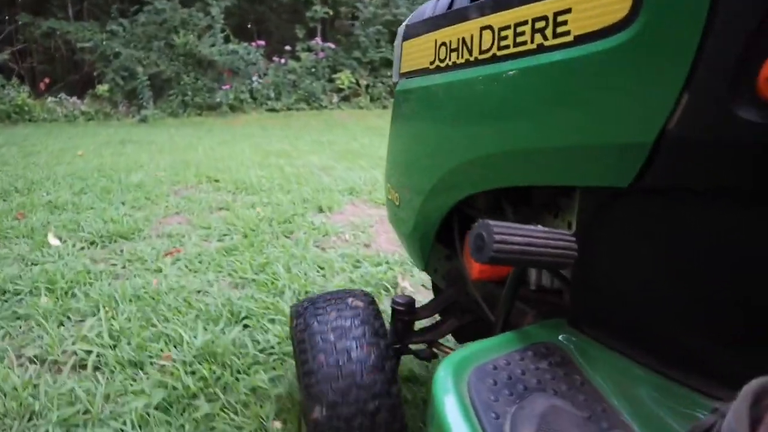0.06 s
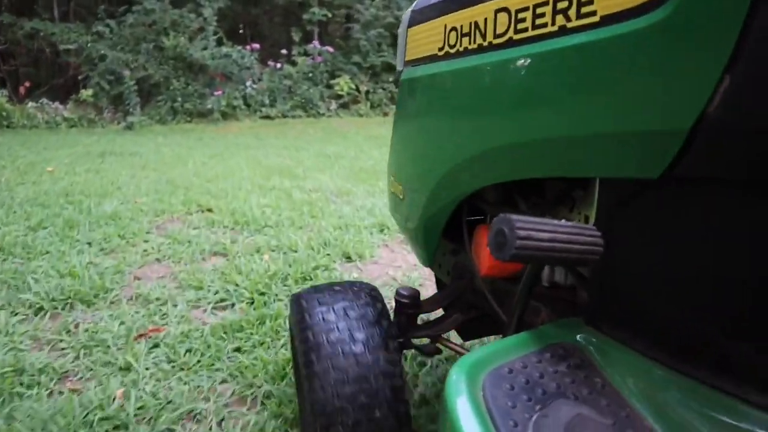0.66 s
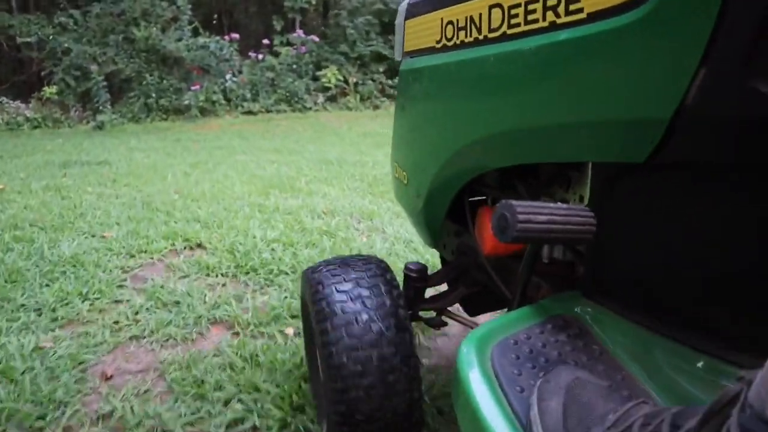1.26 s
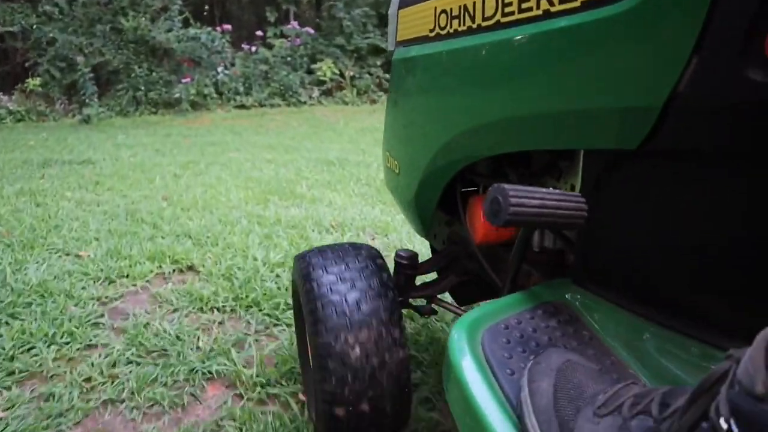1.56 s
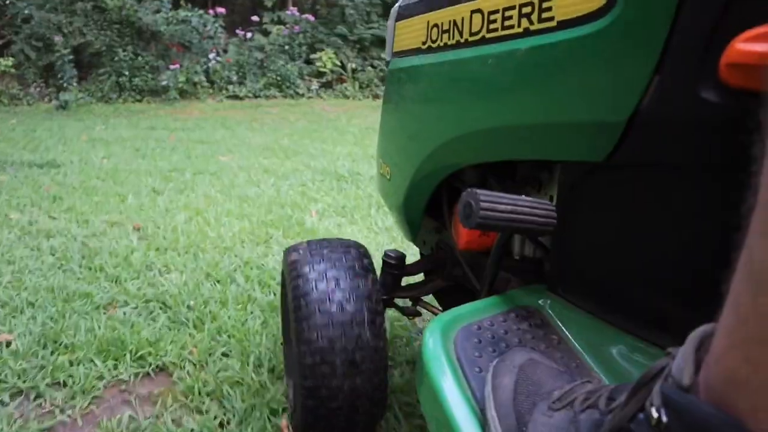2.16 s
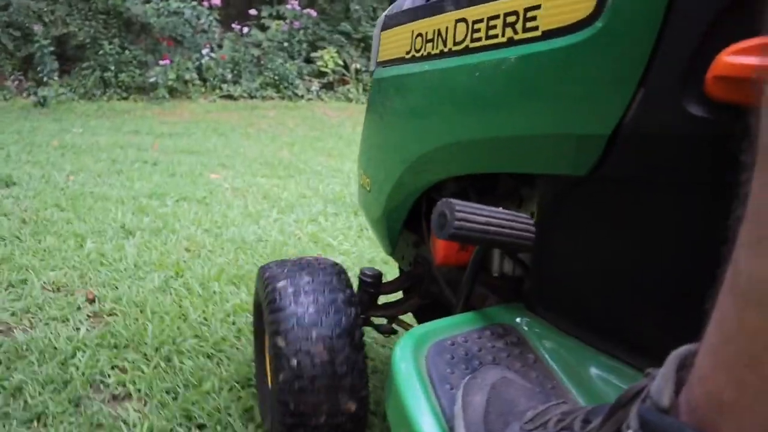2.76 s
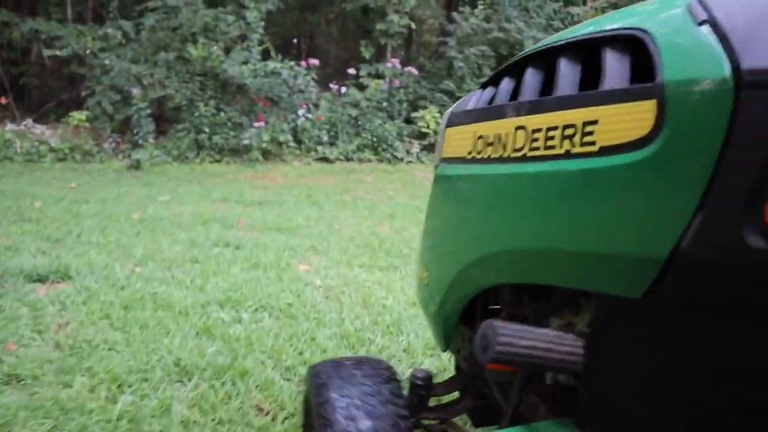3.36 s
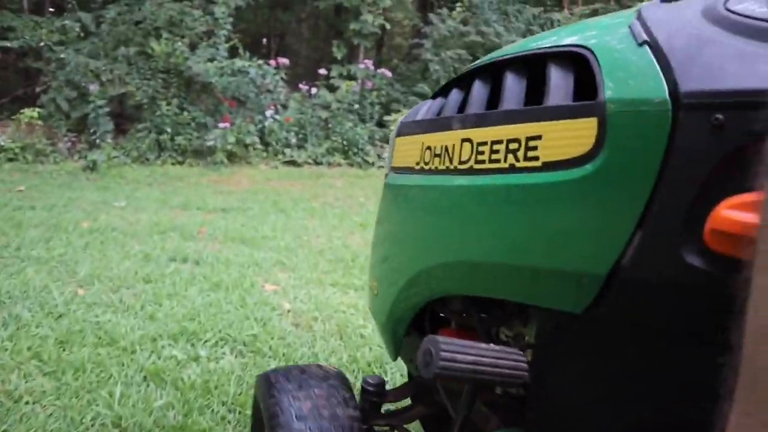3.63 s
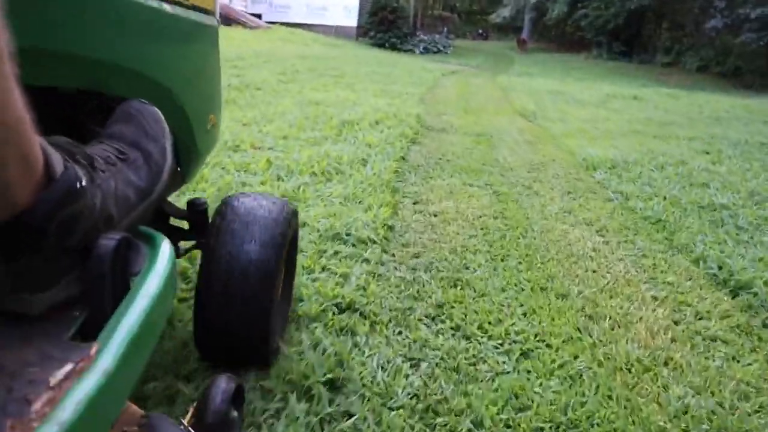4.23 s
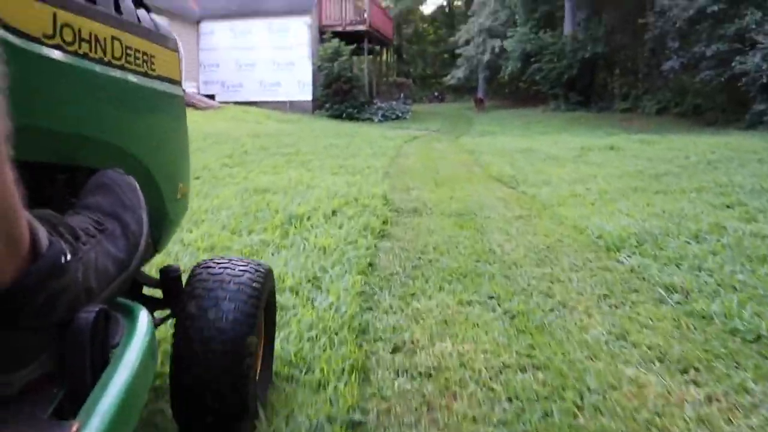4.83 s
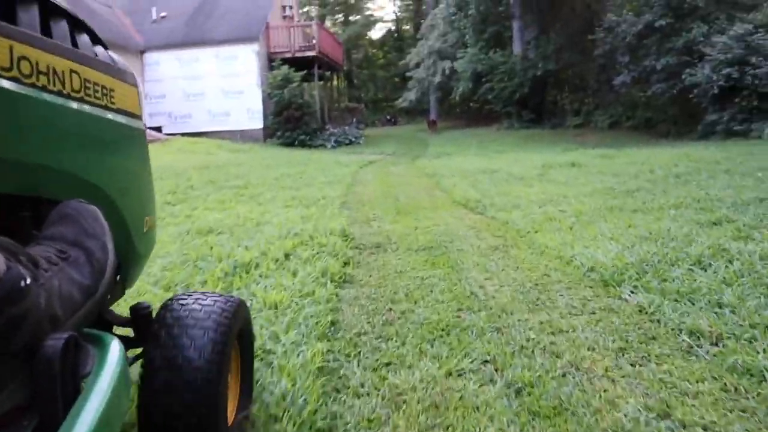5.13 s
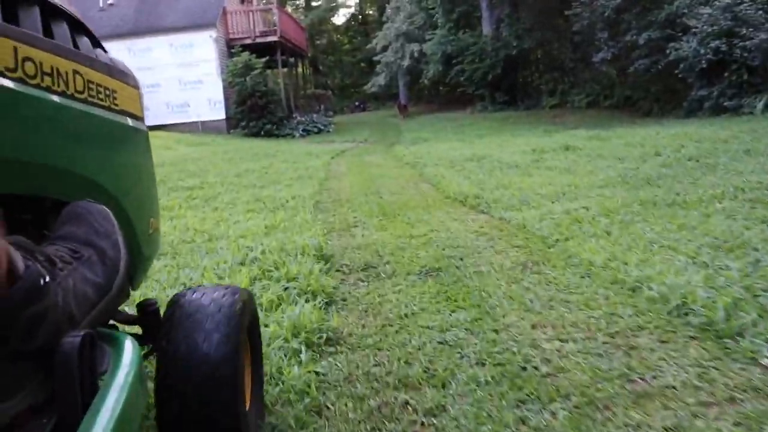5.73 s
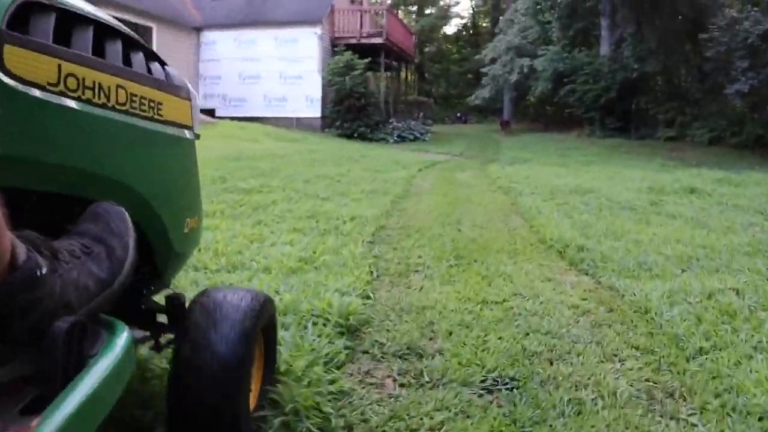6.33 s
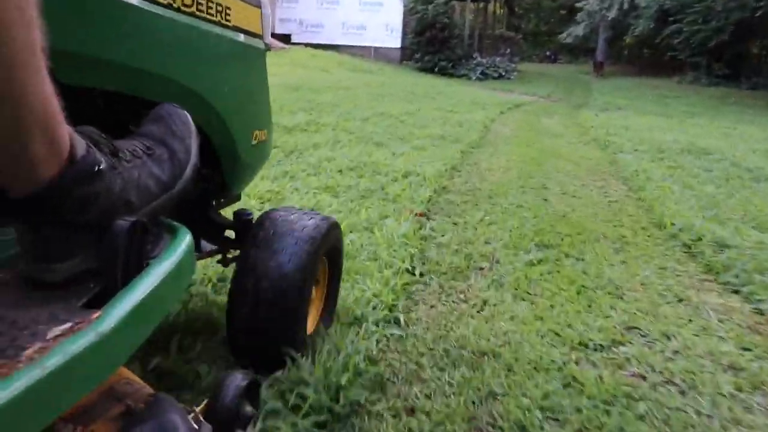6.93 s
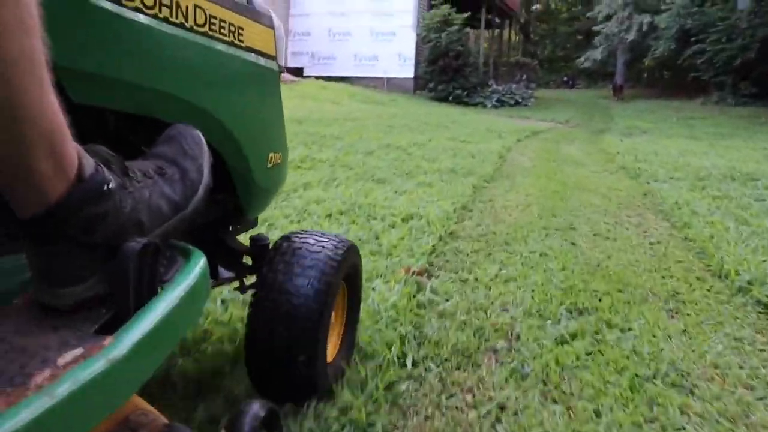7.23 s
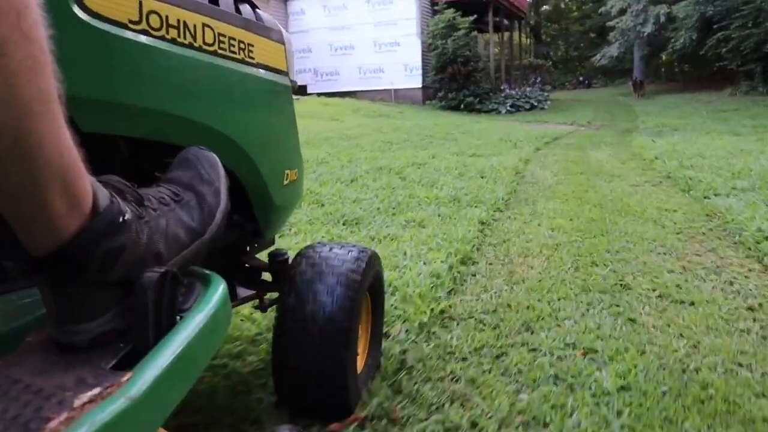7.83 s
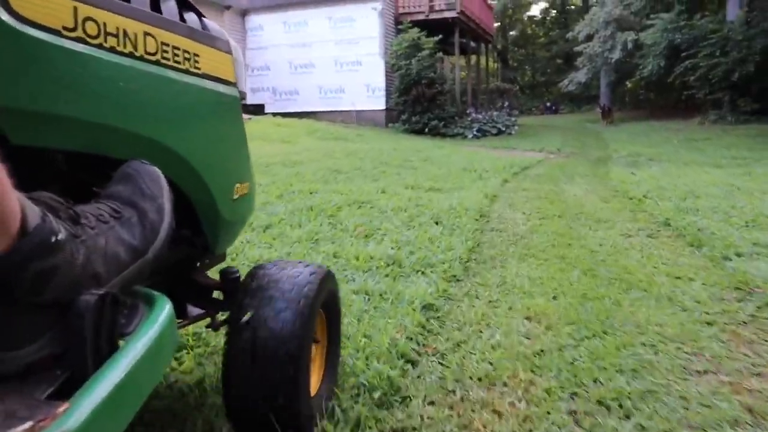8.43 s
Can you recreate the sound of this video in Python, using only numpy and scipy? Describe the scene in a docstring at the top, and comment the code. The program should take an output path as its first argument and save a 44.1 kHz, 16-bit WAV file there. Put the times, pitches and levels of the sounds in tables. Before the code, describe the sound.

A riding mower drones and rattles while cutting grass, then abruptly switches to rolling with blades off, its engine wavering amid hiss.

```python
"""On a lawn, beside the driver's foot on a single-cylinder riding mower: two scenes, a brief dip between.
First the blades cut: a beating, throbbing drone over the engine, with rattling panels, a chirping belt,
rushing air, ticking clippings and one twig that strikes the steel deck. Then, from the other side and
with the blades off, the mower rolls amid a wide treble hiss. Its engine hunts on the governor: the
exhaust barks harder when the speed sags, and the cooling fan whines as its pitch crosses a resonance."""
import sys
import numpy as np
from scipy import signal
from scipy.fft import rfft, irfft
from scipy.io import wavfile
from scipy.ndimage import uniform_filter1d, map_coordinates

SR = 44100
rng = np.random.default_rng(int(sys.argv[2]) if len(sys.argv) > 2 else 0)


def dump_mix(stems):
    """Bounce the given channels to the path in sys.argv[1] as a 16-bit WAV at rate SR."""
    frames = np.atleast_2d(stems).T  # one column per channel
    limited = np.clip(frames, -1, 1)  # hard clip at full scale
    pcm = np.round(limited * 32767).astype(np.int16)
    wavfile.write(sys.argv[1], SR, pcm)


N = 383229
TIME = np.arange(N) / SR
HZ = np.fft.rfftfreq(N, 1 / SR)


def gain_of(db):
    return 10 ** (np.asarray(db) / 20)


def unit_rms(x):
    return x / np.sqrt(np.mean(x ** 2) + 1e-20)


def spectrum(rows):
    """One value per FFT bin, interpolated in log frequency."""
    hz, value = np.transpose(rows)
    return np.interp(np.log(HZ + 1), np.log(hz + 1), value)


def curves(rows):
    """One value per sample for each column of a timed table."""
    seconds, *columns = np.transpose(rows)
    return [np.interp(TIME, seconds, column) for column in columns]


def wander(cycles):
    """A new random value at each whole cycle, joined by ramps."""
    steps = cycles - np.floor(cycles.min())
    return map_coordinates(rng.standard_normal(int(steps.max()) + 2), [steps], order=1)


def bump(cycles, at, width):
    """One smooth bump a cycle; place and width in cycles."""
    return np.exp(-(np.sin(np.pi * (cycles - at)) / (np.pi * width)) ** 2)


def stereo_noise(colour_db, coherence):
    """Coloured noise, partly shared between left and right."""
    a, b = rfft(rng.standard_normal((2, N)))
    alike = np.clip(spectrum(coherence), 0, 1)
    shared, apart = a * np.sqrt((1 + alike) / 2), b * np.sqrt((1 - alike) / 2)
    return unit_rms(irfft(np.array([shared + apart, shared - apart]) * gain_of(colour_db), N))


def tone(cycles, order, db, rough, flutter_hz):
    """One rotating order, shaken in level and phase by turbulence."""
    shake = 1 + rough * (wander(TIME * flutter_hz) + 1j * wander(TIME * flutter_hz))
    carrier = np.exp(2j * np.pi * (order * cycles + rng.random()))
    return np.sqrt(2) * gain_of(db) * (shake * carrier).real


def pan(sound, balance, lead, corner_hz, steepness):
    """Tilts the level; one side leads (+1 left, -1 right), nearing opposite phase in the treble."""
    phase = lead * np.pi * (1 - np.exp(-(HZ / corner_hz) ** steepness))
    lean = gain_of(spectrum(balance) / 2) * np.exp(.5j * phase)
    pair = np.array([lean, 1 / lean])
    return irfft(rfft(sound) * pair / np.sqrt(np.mean(abs(pair) ** 2, 0)), N)


def crank(rpm):
    """Counts firing cycles, one per two turns of a slightly uneven crank."""
    return np.cumsum(rpm) / (2 * 60 * SR) + .003 * wander(TIME * 6)


def pulses(cycles, gains, phases, at, uneven_db, jitter):
    """One pulse a cycle, built from firing orders; no two match in timing or strength."""
    size = 2048
    shape = irfft(np.r_[0, gains * np.exp(1j * phases)], size) * size / np.sqrt(2)
    place = cycles - at + jitter * wander(cycles - at)
    strength = gain_of(uneven_db * wander(cycles - at))
    return np.interp(place % 1 * size, np.arange(size), shape) * strength


def engine(cycles, orders, effort, gulp_at, bark_at, gulp_sweep, uneven_db, jitter, gulp_orders):
    """Four-stroke: the intake gulps in the low orders, the exhaust barks in the rest. Timing in cycles."""
    order, db = np.transpose(orders)
    low = order <= gulp_orders
    gulp_phase = -np.pi * gulp_sweep * order ** 2
    # The pipe end returns the bark inverted and thinner; this sets its phases.
    echo_cycles, echo_equal_order = .148, 16
    echo = order / echo_equal_order * np.exp(-2j * np.pi * order * echo_cycles)
    bark_phase = np.angle(1j * (1 - echo))
    gulp = pulses(cycles, gain_of(db) * low, gulp_phase, gulp_at, uneven_db=.5, jitter=.002)
    bark = pulses(cycles, gain_of(db) * ~low, bark_phase, bark_at, uneven_db, jitter)
    return gulp * gain_of(.08 * effort) + bark * gain_of(.17 * effort)


# Valve knocks. Each row: place in cycles, relative level in dB.
VALVE_KNOCKS = [(.15, -1.5), (.58, 0.5), (.78, -7), (.96, -5)]

def valve_gear(cycles, modes, level_db):
    """The valve gear raps the sheet metal four times a cycle: a ringing rasp."""
    t = TIME[:SR // 8]
    hits = sum(gain_of(db) * np.diff(np.floor(cycles - at), append=np.floor(cycles[-1] - at))
               for at, db in VALVE_KNOCKS)
    hits *= gain_of(1.8 * rng.standard_normal(N))
    ring = sum(gain_of(db - 60 * t / t60) * np.sin(2 * np.pi * hz * t) for hz, db, t60 in modes)
    return gain_of(level_db) * unit_rms(signal.oaconvolve(hits, ring)[:N])


# Panel modes. Each row: frequency in Hz, relative level in dB, T60 in seconds.
HOOD_PANEL_MODES = [(1640, -4, .04), (1690, 0, .07), (1760, 0, .07), (1930, -6, .04)]
STEEL_DECK_MODES = [(4130, 0, .04), (4200, -2, .04), (4255, 1.5, .055), (4315, -4, .05), (5410, -11, .04),
                    (6450, -11, .02), (6960, -11, .025), (7320, -13, .04), (7750, -15, .02)]
# Panel rattle. Each row: time in seconds, level in dB.
HOOD_RATTLE_DB = [(0, -33), (1.35, -32.5), (1.7, -39), (2.6, -39), (3.2, -46), (3.75, -43)]
DECK_RATTLE_DB = [(0, -49), (1.45, -49), (1.6, -40.5), (2.8, -40), (3.2, -43), (3.75, -46)]

def rattle(taps_per_s=160):
    """Loose panels chatter, first mostly the hood, then the deck; each tap rings the modes unevenly."""
    t, out = TIME[:SR // 8], np.zeros((2, N))
    for modes, level in (HOOD_PANEL_MODES, HOOD_RATTLE_DB), (STEEL_DECK_MODES, DECK_RATTLE_DB):
        taps = rng.random(N) < taps_per_s / SR
        panel = np.zeros((2, N))
        for hz, db, t60 in modes:
            ring = gain_of(db - 60 * t / t60) * np.sin(2 * np.pi * hz * t)
            panel += signal.oaconvolve(taps * rng.standard_normal((2, N)), ring[None], axes=1)[:, :N]
        out += gain_of(curves(level)[0]) * unit_rms(panel)
    return out


# Drone overtones. Each row: multiple of the blade-tip rate, relative level in dB.
BLADE_ORDERS = [(4, -36), (5, -34.5), (6, -34), (7, -35), (9, -45), (10, -37.5), (11, -42), (14, -42.5),
                (20, -51)]
# Throbs of the drone's octave. Each row: peak time in seconds, relative level in dB.
OCTAVE_THROBS = [(0.22, -28), (0.55, -25.5), (0.87, -27), (1.32, -21), (1.71, -20.5), (2.02, -27.5),
                 (2.42, -24.5), (3.04, -30), (3.31, -29)]

def blades(crank_rpm, belt_ratio=.842, beat_hz=.422, beat_peak_s=1.58, throb_s=.1):
    """Two tips a turn sweep the deck wall; one blade slips behind the other, so the drone beats."""
    rpm = belt_ratio * crank_rpm + 25.53 * wander(TIME * 5)
    passes = 2 * np.cumsum(rpm) / (60 * SR)
    beat = abs(gain_of(-33) + gain_of(-35.5) * np.exp(2j * np.pi * beat_hz * (TIME - beat_peak_s)))
    throb = sum(gain_of(db) * np.exp(-((TIME - s) / throb_s) ** 2) for s, db in OCTAVE_THROBS)
    fundamental = beat * tone(passes, 1, 0, rough=.077, flutter_hz=14)
    octave = (gain_of(-33) + throb) * tone(passes, 2, -1.4, rough=.073, flutter_hz=12)
    third = tone(passes, 3, -32, rough=.35, flutter_hz=7)
    overtones = sum(tone(passes, k, db, rough=.5, flutter_hz=min(3 * k, 15)) for k, db in BLADE_ORDERS)
    return fundamental + octave + third + gain_of(-1.5) * overtones


# Belt chirps. Each row: time in seconds, level in dB.
BELT_DB = [(0, -45), (.9, -42), (1.3, -44), (2, -46), (3.75, -50)]

def belt(pitch_hz=5530, wander_hz=55, slip_hz=30):
    """The deck belt slips on its pulley in brief, thin chirps."""
    cycles = np.cumsum(pitch_hz + wander_hz * wander(TIME * slip_hz)) / SR
    slip = np.clip(wander(TIME * slip_hz), 0, 1)
    chirps = slip * tone(cycles, 1, 0, rough=.7, flutter_hz=200)
    return gain_of(curves(BELT_DB)[0]) * unit_rms(chirps)


# Hiss swells and dips. Each row: place in cycles, width in cycles, gain in dB at pulsing=1.
HISS_BUMPS = [(.28, .09, 3.5), (.57, 0.065, -19), (.99, 0.062, 5)]

def air_rush(cycles, colour, resonances, coherence, effort, mid_db, hiss_db,
             puff, puff_at, clatter, pulsing):
    """Turbulence in the machine's cavities puffs with the exhaust and clatters with the valve gear."""
    resonance_db = sum(db * np.exp(-(2 * (HZ - hz) / width) ** 2) for hz, width, db in resonances)
    air = rfft(stereo_noise(spectrum(colour) + resonance_db, coherence))
    low = 1 / (1 + (HZ / 750) ** 4)
    high = 1 - 1 / (1 + (HZ / 6500) ** 4)
    puffs = unit_rms(1 + puff * bump(cycles, puff_at, width=.075))
    body = irfft(air * low, N) * gain_of(.23 * effort) * puffs
    valves = unit_rms(1 + clatter * bump(cycles, at=.9, width=.14))
    middle = irfft(air * (1 - low - high), N) * valves * gain_of(mid_db + wander(TIME * 18))
    cycle_db = pulsing * sum(db * bump(cycles, at, width) for at, width, db in HISS_BUMPS)
    hiss = irfft(air * high, N) * gain_of(hiss_db + cycle_db + 1.3 * wander(TIME * 40))
    return body + middle + hiss


def clippings(coherence, level_db=-39.5, hits_per_s=140, decay_s=.0056):
    """Bits of grass and grit tick against the deck."""
    hits = (rng.random(N) < hits_per_s / SR) * gain_of(-10 * np.minimum(rng.exponential(1, N), 4))
    envelope = signal.lfilter([1], [1, -np.exp(-1 / (decay_s * SR))], hits)
    colour_db = spectrum([(100, -70), (2500, 0), (6500, -1), (11000, -27), (14000, -45)])
    return gain_of(level_db) * unit_rms(envelope * stereo_noise(colour_db, coherence))


# Twig strike and rebounds. Each row: start in seconds, relative level in dB.
TWIG_BLOWS = [(1.506, -22), (1.509, -19), (1.521, -23), (1.527, -27)]

def twig():
    """Each blow cracks and rings the steel deck, a little differently left and right."""
    t, out = TIME[:SR // 4], np.zeros((2, N))
    band = signal.butter(3, [3200, 8000], "bandpass", fs=SR, output="sos")
    for start_s, db in TWIG_BLOWS:
        ring = sum(gain_of(mode_db - 60 * t / t60) * np.sin(2 * np.pi * (hz * t + rng.random((2, 1))))
                   for hz, mode_db, t60 in STEEL_DECK_MODES)
        crack = 1.2 * signal.sosfilt(band, np.exp(-t / .004) * rng.standard_normal((2, len(t))))
        start = round(start_s * SR)
        out[:, start:start + len(t)] += gain_of(db) * (ring + crack)
    return out


# Crank speed. Each row: time in seconds, speed in rpm.
MOWING_RPM = [(0, 3028), (0.68, 3004), (0.97, 3027), (1.75, 3004), (2.42, 3013), (3.16, 3017), (3.31, 2978),
              (3.47, 3010), (3.75, 2977)]
# Slow, irregular swell and dip of the engine's loudness. Each row: time in seconds, unitless effort.
ENGINE_SWELL = [(0, -1), (1.2, 6), (1.4, -8), (1.8, 6), (2.25, -8), (2.7, 0), (3.15, -7), (3.4, 8),
                (3.75, 1)]
# Engine tone. Each row: multiple of the firing rate, level in dB at zero effort.
MOWING_ENGINE_DB = [(1, -56), (2, -40.5), (3, -57), (4, -38), (5, -33.5), (6, -36.5), (7, -45.5), (8, -32),
                    (9, -42), (10, -32), (11, -32), (12, -51), (13, -35), (14, -38.5), (15, -40.5),
                    (16, -52), (17, -39.5), (18, -38), (19, -36.5), (20, -37.5), (21, -36.5), (22, -34.5)]
# Metal rung by the valve gear. Each row: frequency in Hz, relative level in dB, T60 in seconds.
MOWING_VALVE_MODES = [(1685, 8, 0.069), (1770, -10, 0.035), (2895, 2, 0.041), (3650, -21, 0.032),
                      (4130, -8, 0.079)]
# Air swell. Each row: time in seconds, mid gain in dB, treble gain in dB.
MOWING_AIR_DB = [(0, 0, -1.5), (0.5, -0.4, -0.5), (0.75, 0.4, -0.5), (1.3, 0.7, -1.5), (2.1, 0.5, -0.5),
                 (2.85, 0.5, -1.5), (3.2, -1.1, -4), (3.75, -1, -1)]
# Air spectrum. Each row: frequency in Hz, relative density in dB.
MOWING_AIR_COLOUR = [(30, -34), (62, -23), (90, -13), (140, -2), (280, -2.5), (370, -5.5), (530, -1.5),
                     (680, -6.5), (1450, -13), (1800, -10.5), (4100, -17.5), (7500, -28.5), (12400, -27.5),
                     (13800, -62)]
# Deck resonances and hollows. Each row: centre in Hz, width in Hz, gain in dB.
DECK_RESONANCES = [(110, 40, -5), (690, 90, -2), (850, 60, 2.5), (950, 80, 2), (1200, 90, 1.5),
                   (1480, 160, -1.5), (2200, 300, -1.5), (3700, 160, -3), (3970, 180, 2), (4440, 300, -2),
                   (5000, 400, -1.5)]
# Noise likeness. Each row: frequency in Hz, left-right coherence from 0 to 1.
MOWING_COHERENCE = [(130, 1), (300, .99), (630, .93), (1400, .66), (2800, .55), (5000, .74), (9000, .87),
                    (12000, .95)]
# Balance. Each row: frequency in Hz, left minus right in dB.
MOWING_PAN_DB = [(110, 0), (200, -1), (370, -1.5), (680, -2), (1250, -1.5), (2300, 0)]

def mowing():
    """The engine drives the blades; its loudness slowly swells and dips."""
    (rpm,), (effort,) = curves(MOWING_RPM), curves(ENGINE_SWELL)
    mid_db, hiss_db = curves(MOWING_AIR_DB)
    cycles = crank(rpm)
    motor = engine(cycles, MOWING_ENGINE_DB, effort, gulp_at=.42, bark_at=.89,
                   gulp_sweep=.07, uneven_db=2, jitter=.003, gulp_orders=10)
    air = air_rush(cycles, MOWING_AIR_COLOUR, DECK_RESONANCES, MOWING_COHERENCE, effort,
                   mid_db, hiss_db, puff=.21, puff_at=1, clatter=.21, pulsing=.33)
    ticks = clippings(MOWING_COHERENCE)
    metal = valve_gear(cycles, MOWING_VALVE_MODES, level_db=-38) + rattle()
    sound = motor + metal + blades(rpm) + belt() + gain_of(-18) * air + ticks + twig()
    return pan(sound, MOWING_PAN_DB, lead=-.81, corner_hz=2720, steepness=1.47)


def governor(rpm, set_rpm, smooth_s=.1):
    """The throttle opens: effort grows as the speed sags and while it picks up again."""
    pickup_rpm_per_s = uniform_filter1d(np.gradient(rpm) * SR, round(smooth_s * SR))
    return .024 * (set_rpm - rpm) + .0008 * pickup_rpm_per_s


# Slow fan swell. Each row: time in seconds, gain in dB.
FAN_SWELL_DB = [(3.81, -2), (4.15, -1.5), (4.32, 2), (4.55, -3), (4.95, 3.5), (5.35, 2.5), (5.62, -4),
                (5.82, 4), (6.2, 2), (6.45, -4), (6.78, -4.5), (7.1, -2), (7.55, 2), (7.85, 0), (8.1, -2.5),
                (8.3, 3), (8.55, -1), (8.69, -2)]

def fan(cycles, rpm, vanes=12, resonance_hz=652, width_hz=21.5):
    """The cooling fan's vanes whine, loudest where their pitch meets a hood resonance."""
    pitch_hz = vanes * rpm / 60
    bloom = gain_of(-31) + gain_of(-29.5) / (1 + (2 * (pitch_hz - resonance_hz) / width_hz) ** 2)
    return bloom * tone(cycles, 2 * vanes, curves(FAN_SWELL_DB)[0], rough=.2, flutter_hz=32)


# Fan and gear tones. Each row: multiple of the firing rate, level in dB.
WHINE_ORDERS = [(25, -40.5), (26, -44), (32, -40), (33, -42), (36, -48), (38, -48), (40, -42), (44, -44.5),
                (46, -54), (48, -45), (50, -46), (62, -53), (66, -53), (67, -51)]
# Whine on firing order 28. Each row: time in seconds, level in dB.
ORDER_28_DB = [(3.81, -32), (4.05, -30.5), (4.3, -38), (4.55, -35), (4.9, -43), (5.3, -37), (5.53, -30),
               (5.9, -35), (6.3, -36), (6.6, -45), (7.05, -38), (7.4, -33.5), (8.69, -33)]

def whine(cycles):
    """Fan and gears sing above the engine tone; one order comes and goes."""
    steady = sum(tone(cycles, k, db, rough=.35, flutter_hz=12) for k, db in WHINE_ORDERS)
    return steady + tone(cycles, 28, curves(ORDER_28_DB)[0], rough=.2, flutter_hz=12)


# Wide treble hiss. Each row: time in seconds, level in dB.
WIDE_HISS_DB = [(3.81, -44), (4.7, -44), (5.2, -51), (5.7, -49.5), (6.2, -46), (6.65, -42.5), (7.2, -40.5),
                (7.8, -41), (8.15, -43.5), (8.69, -41.5)]
# Its spectrum. Each row: frequency in Hz, relative density in dB.
WIDE_HISS_COLOUR = [(500, -41), (3000, -6.5), (5000, 2.5), (8000, -0.5), (11500, -2.5), (14000, -36.5)]

def wide_hiss(flicker_db=1.8, flicker_hz=40):
    """Treble hiss, different left and right, thins near 5-6 s and then returns."""
    hiss = irfft(rfft(rng.standard_normal((2, N))) * gain_of(spectrum(WIDE_HISS_COLOUR)), N)
    return unit_rms(hiss) * gain_of(curves(WIDE_HISS_DB)[0] + flicker_db * wander(TIME * flicker_hz))


# Hunting crank speed. Each row: time in seconds, speed in rpm.
ROLLING_RPM = [(3.81, 3254), (4.02, 3242), (4.19, 3199), (4.26, 3225), (4.66, 3111), (4.83, 3247),
               (5.4, 3195), (5.62, 3148), (5.8, 3261), (6.02, 3227), (6.84, 3174), (7.18, 3313),
               (7.53, 3086), (7.8, 3282), (8.21, 3192), (8.37, 3068), (8.57, 3250), (8.69, 3157)]
# Engine tone. Each row: multiple of the firing rate, level in dB at zero effort.
ROLLING_ENGINE_DB = [(1, -49.5), (2, -36), (3, -56), (4, -31.5), (5, -29), (6, -29.5), (7, -36.5),
                     (8, -29.5), (9, -32), (10, -33), (11, -37.5), (12, -38.5), (13, -45.5), (14, -39.5),
                     (15, -38), (16, -34), (17, -31.3), (18, -30), (19, -29.3), (20, -36.5), (21, -34),
                     (22, -35.5), (23, -40)]
# Metal rung by the valve gear. Each row: frequency in Hz, relative level in dB, T60 in seconds.
ROLLING_VALVE_MODES = [(1085, -5, .051), (1205, -8, .035), (1670, -3, .012), (1870, -6, .022),
                       (2240, -2, .013)]
# Air spectrum. Each row: frequency in Hz, relative density in dB.
ROLLING_AIR_COLOUR = [(25, -22), (70, -12), (110, -16), (260, -0.5), (350, -4), (500, -1.5), (800, -3.5),
                      (1450, -10), (1750, -8.5), (3400, -16), (4500, -19), (8500, -25.5), (12200, -23.5),
                      (13800, -36)]
# Hood resonances and hollows. Each row: centre in Hz, width in Hz, gain in dB.
HOOD_RESONANCES = [(800, 60, -3), (1590, 90, -2.5), (1860, 120, 2.5), (2900, 200, 1.5), (3950, 250, 1.5),
                   (5550, 400, 2), (7700, 900, 2)]
# Noise likeness. Each row: frequency in Hz, left-right coherence from 0 to 1.
ROLLING_COHERENCE = [(130, 1), (300, .98), (630, .92), (1400, .62), (2800, .62), (5000, .86), (8000, .975),
                     (12000, .998)]
# Balance. Each row: frequency in Hz, left minus right in dB.
ROLLING_PAN_DB = [(110, 0), (200, 1), (370, 3), (680, 6), (1250, 4), (2300, 2), (4200, 1.5), (9000, 0)]

def rolling(start_s=3.81, start_cycles=.0345, set_rpm=3200):
    """Blades off, the engine hunts; exhaust, fan and rushing air follow its speed."""
    rpm, = curves(ROLLING_RPM)
    cycles = crank(rpm)
    cycles = cycles - cycles[round(start_s * SR)] + start_cycles
    effort = governor(rpm, set_rpm)
    speed_db = .008 * (rpm - set_rpm)
    motor = engine(cycles, ROLLING_ENGINE_DB, effort, gulp_at=.74, bark_at=.002,
                   gulp_sweep=0, uneven_db=.9, jitter=.001, gulp_orders=9)
    high_tones = whine(cycles)
    air = air_rush(cycles, ROLLING_AIR_COLOUR, HOOD_RESONANCES, ROLLING_COHERENCE, .4 * effort,
                   mid_db=speed_db, hiss_db=1, puff=.46, puff_at=.12, clatter=.24, pulsing=1)
    rasp = valve_gear(cycles, ROLLING_VALVE_MODES, level_db=speed_db - 35)
    sound = motor + rasp + fan(cycles, rpm) + high_tones + gain_of(-22.5) * air
    return pan(sound, ROLLING_PAN_DB, lead=.99, corner_hz=1830, steepness=1.72) + wide_hiss()


def scene():
    """Mowing fades out as rolling fades in; the level dips briefly."""
    change_s = 3.783
    fade_out = np.clip((change_s + .006 - TIME) / .04, 0, 1) ** 2
    fade_in = np.clip((TIME - change_s + .01) / .036, 0, 1) ** 1.6
    return mowing() * fade_out + rolling() * fade_in


def record(dry):
    """Steep low-pass at 14.2 kHz."""
    lowpass = signal.firwin(511, 14200, window=("kaiser", 9), fs=SR)
    return signal.oaconvolve(dry, lowpass[None], "same")


dry = scene()
out = record(dry)
dump_mix(out)
```